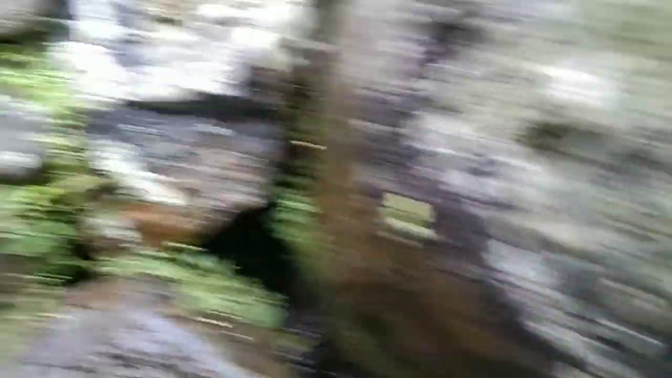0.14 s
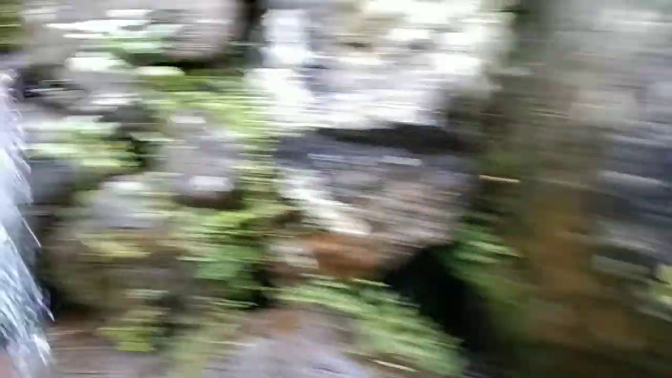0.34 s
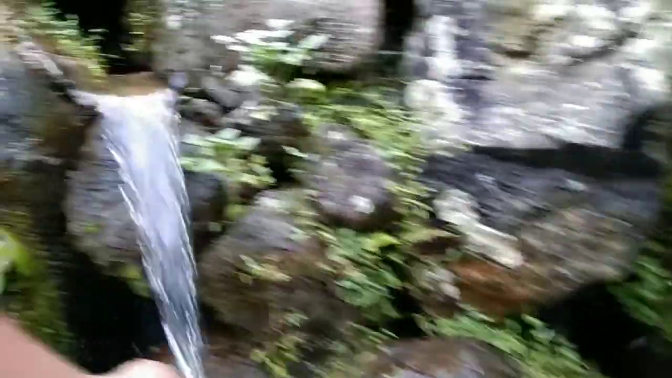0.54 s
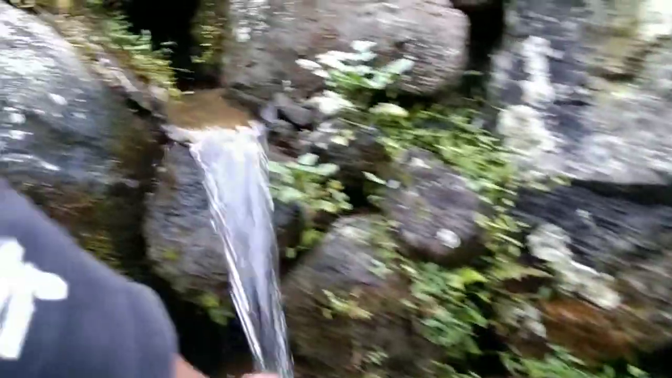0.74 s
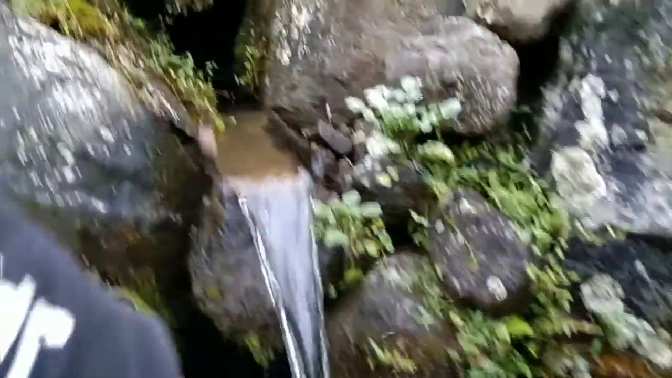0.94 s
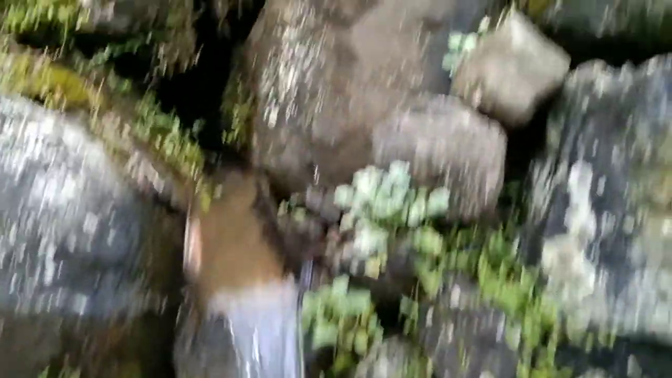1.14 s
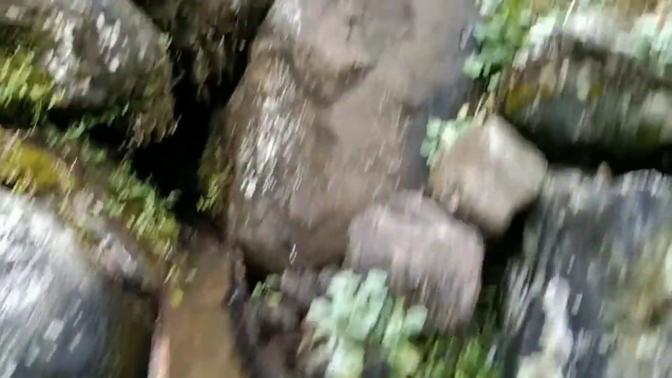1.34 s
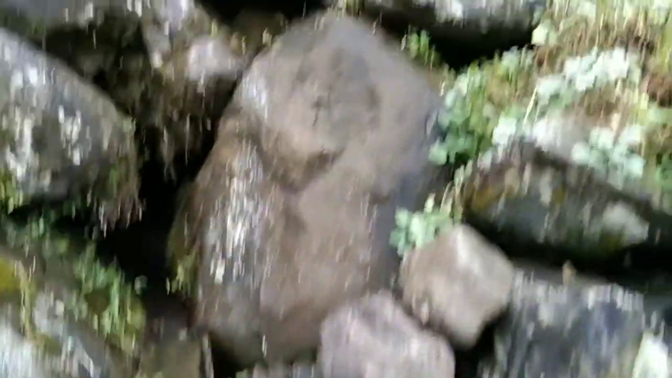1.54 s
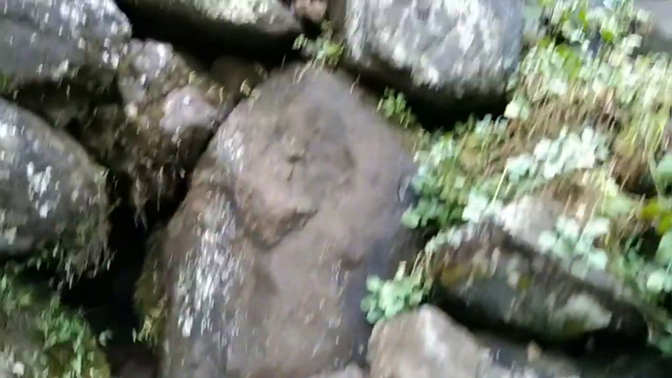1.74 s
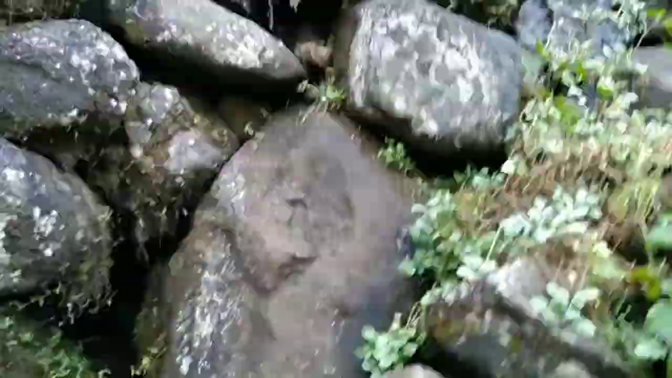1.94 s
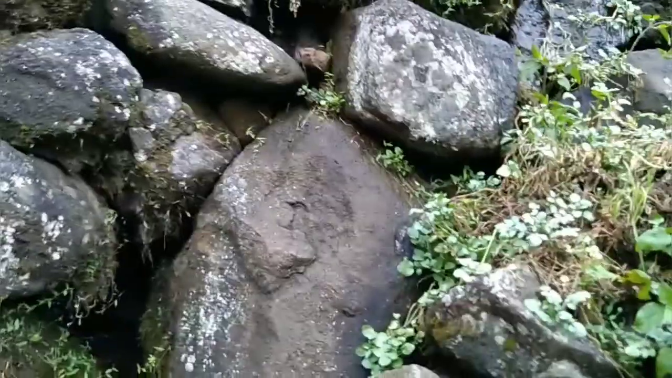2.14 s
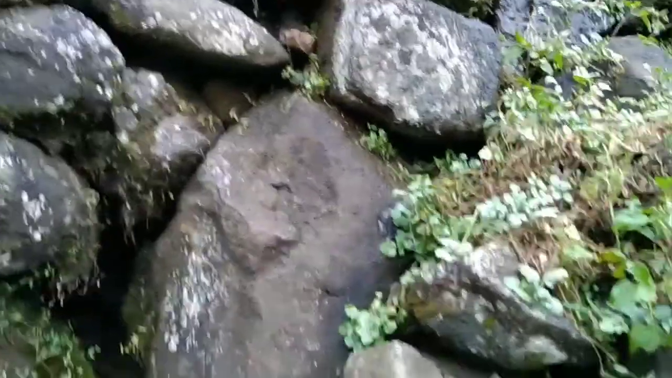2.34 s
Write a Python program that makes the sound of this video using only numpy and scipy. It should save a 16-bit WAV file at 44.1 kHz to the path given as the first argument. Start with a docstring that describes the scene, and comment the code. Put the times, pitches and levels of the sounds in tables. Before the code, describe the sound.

Small stream of water splashing onto rocks, swelling to a crisp spattering rush, then thinning away

```python
"""At the foot of a small waterfall over rocks and a pool; a hand-held camera swings towards it and away again.
Coloured noise rushes; clumped noise drops and fizz make spray that swells as the microphone faces the fall.
Short noise cracks splat, decaying tones bubble, a wandering noise band is a thin jet, low sine swells are bumps
of the hand. The recorder's noise suppressor has learned the rush and lets through mainly what rises above it,
in flickering streaks; narrow bands of noise laid into the water trigger some of its openings."""
import sys
import numpy as np
from scipy import signal
from scipy.fft import rfft, irfft
from scipy.io import wavfile

SR = 44100
rng = np.random.default_rng(int(sys.argv[2]) if len(sys.argv) > 2 else 0)


def rack_gain(trim_db):
    """Turn a fader trim in dB into the linear factor to multiply a signal by."""
    fader = np.asarray(trim_db, float)
    return 10 ** (fader / 20)


def master_out(mix):
    """Clip the mix to full scale and print it as 16-bit PCM to the path in sys.argv[1]."""
    frames = np.transpose(np.atleast_2d(mix))
    ceiling = np.clip(frames, -1, 1)
    pcm = np.round(ceiling * 32767).astype(np.int16)
    wavfile.write(sys.argv[1], SR, pcm)


N = 105840  # samples, 2.4 s


def rms_one(x):
    """Scales a sound to an rms of 1."""
    return x / np.sqrt(np.mean(x ** 2) + 1e-20)


def in_time(rows):
    """Turns (time, values..) rows into one curve of straight lines per value."""
    s, *columns = np.transpose(rows)
    return [np.interp(np.arange(N) / SR, s, column) for column in columns]


def drift(rate_hz):
    """Random wander of spread 1: noise through two equal low-pass poles at rate_hz."""
    r = np.exp(-80 * np.pi * rate_hz / SR)  # runs at SR / 40
    noise = rng.standard_normal(N // 40 + 2002)
    slow = signal.lfilter([1], [1, -2 * r, r * r], noise)[2000:]
    return np.interp(np.arange(N) / 40, np.arange(len(slow)), rms_one(slow))


def band(x, low, high, order=3):
    """Keeps the part of a sound between two frequencies in Hz."""
    sos = signal.butter(order, [low, min(high, .45 * SR)], "band", fs=SR, output="sos")
    return signal.sosfilt(sos, x)


def lay(out, s, sound):
    """Adds one event to a layer at its time in seconds."""
    start = int(s * SR)
    out[start:start + len(sound)] += sound


def rush():
    """Even, coloured noise of the whole stream: countless small impacts blur into one."""
    # colour of the stream: (frequency [Hz], relative level [dB per Hz])
    colour = [(30, -43), (60, 1), (130, 4), (300, 3), (1000, 1), (2500, 3), (4000, 1.5), (7500, 1.5),
              (10000, -1), (13500, -4.5), (15800, -7.5)]
    level_db = -29
    points = np.array(colour)
    hz = np.fft.rfftfreq(N, 1 / SR)
    shape = rack_gain(np.interp(np.log(hz + 1), np.log(points[:, 0]), points[:, 1]))
    noise = irfft(rfft(rng.standard_normal(N)) * shape, N)
    return rack_gain(level_db) * rms_one(noise)


def fizz():
    """Tiny bubbles ring briefly at 40 pitches from 1 to 15 kHz, stronger with rising pitch."""
    per_s, spread_db = 2000, 5.5
    ring_cycles = 44  # until 60 dB down
    born = rng.random(N) < per_s / SR
    sizes = born * rack_gain(spread_db * np.minimum(rng.exponential(1, N), 2.5))
    dealt = rng.integers(0, 40, N)  # which pitch each bubble gets
    out = 0
    for k, hz in enumerate(np.geomspace(1000, 15000, 40)):
        r, w = rack_gain(-60 * hz / (ring_cycles * SR)), 2 * np.pi * hz / SR
        strikes = sizes * (dealt == k) + 1e-18
        out = out + hz * signal.lfilter([0, np.sin(w)], [1, -2 * r * np.cos(w), r * r], strikes)
    return rms_one(out)


def spray():
    """Hiss, fizz and dense, clumped drops, each drop a short puff of noise, levelled band by band."""
    # swell of the spray: (time [s], then level [dB] of each band from the lowest up)
    swell = [(0.0, -34.5, -63, -62, -72, -57, -68, -75), (0.07, -39.5, -57, -40, -54, -63, -68, -67),
             (0.111, -35.5, -67, -30, -50, -63, -67, -66), (0.151, -39, -59, -50, -58, -38, -69, -71),
             (0.21, -32, -62, -72, -46, -42, -52, -47), (0.242, -55, -31, -30, -41, -41, -34, -42),
             (0.27, -34.5, -40, -31.5, -41, -37.5, -46, -39.5),
             (0.401, -41.5, -54, -48, -59, -51, -41.5, -39.5),
             (0.432, -34, -55, -28.5, -26.5, -44.5, -36.5, -34),
             (0.47, -51, -60, -55, -51, -33.5, -46, -40), (0.53, -59, -53, -39.5, -32.5, -34, -46, -38),
             (0.555, -37, -36, -36, -32, -31, -37, -36), (0.701, -39.5, -33, -26.5, -27.5, -23, -31, -34.5),
             (1.02, -38.5, -32.5, -27.5, -28, -25.5, -33.5, -34.5),
             (1.318, -51, -33.5, -25, -25, -23, -32.5, -33.5),
             (1.46, -61, -37, -32, -29.5, -36, -42, -36.5),
             (1.76, -57, -75, -40.5, -36, -31.5, -38.5, -38.5),
             (1.92, -66, -65, -39.5, -67, -34.5, -37, -42), (2.03, -64, -65, -39, -50, -47, -60, -41),
             (2.05, -57, -67, -33, -35, -47, -34, -43), (2.13, -52, -58, -45, -40, -42, -48, -38),
             (2.21, -63, -62, -42, -33, -37, -58, -58), (2.23, -61, -59, -45, -42, -37, -36, -42),
             (2.33, -65, -68, -47.5, -38, -41.5, -40, -38), (2.4, -63, -67, -33.5, -48, -32.5, -50, -45)]
    # borders of those bands: (frequency [Hz])
    edges = [900, 2300, 3300, 4700, 6400, 8800, 11500, 16500]
    drops_per_s, drop_spread_db, drop_most_db, drop_ms = 460, 4, 4.5, 2.7
    hiss_share, fizz_db = 0.74, -5
    clump_db, clumps_per_s = 1.5, 29.3

    born = rng.random(N) < drops_per_s / SR
    sizes = born * rack_gain(np.minimum(drop_spread_db * rng.exponential(1, N), drop_most_db))
    puffs = rms_one(signal.lfilter([1], [1, -np.exp(-1000 / (drop_ms * SR))], sizes))
    envelope = hiss_share + (1 - hiss_share) * puffs
    shared = drift(clumps_per_s)
    tones = rack_gain(fizz_db) * fizz()
    out = 0
    for low, high, level_db in zip(edges, edges[1:], in_time(swell)):
        grain = envelope * rng.standard_normal(N) + tones
        # the bands clump partly together, partly on their own
        clumps = rack_gain(clump_db * (shared + 0.68 * drift(clumps_per_s)))
        out = out + rack_gain(level_db) * rms_one(band(grain * clumps, low, high))
    return out


def streaks():
    """Narrow bands of noise set in quickly, sag and stop, as the noise suppressor opens and shuts."""
    # streaks: (time [s], length [s], level at the start [dB], centre [Hz])
    plateaus = [(0.0, 0.19, -41.5, 1930), (0.011, 0.14, -39.5, 2663), (0.015, 0.11, -37.5, 6600),
                (0.049, 0.089, -45.5, 14160), (0.156, .2, -46, 15500), (0.218, 0.11, -46, 11300),
                (0.347, 0.23, -47, 15300), (0.065, 0.028, -38, 1020), (0.155, 0.093, -39.5, 5400),
                (0.166, 0.038, -38, 4620), (0.178, 0.12, -34.5, 7530), (0.185, 0.044, -49, 2360),
                (0.191, 0.025, -39.5, 1227), (0.23, 0.039, -38.5, 3080), (0.236, 0.072, -30.5, 4900),
                (0.255, 0.083, -35, 1580), (0.338, 0.11, -35, 7070), (0.39, 0.038, -41, 2370),
                (0.43, 0.13, -37.5, 1360), (0.431, 0.27, -38.5, 1940), (0.431, 0.23, -40.5, 1580),
                (0.54, 0.15, -38.5, 2560), (0.806, 0.1, -38, 1110), (0.977, 0.09, -37.5, 1004),
                (1.11, 0.11, -38, 1700), (1.17, 0.073, -40, 1950), (1.181, 0.068, -36, 1296),
                (1.306, 0.037, -37, 1015), (1.34, 0.075, -40, 1288), (1.549, .25, -33, 7380),
                (1.698, .15, -32.5, 6200), (1.8, 0.095, -39, 8700), (1.957, 0.099, -49, 9400),
                (2.002, 0.065, -36, 6400), (0.707, 0.14, -44.5, 1367), (2.05, 0.28, -35, 6880),
                (2.1, 0.15, -39.5, 1840), (2.117, 0.093, -42, 5530), (2.157, 0.1, -37.5, 4640),
                (2.172, 0.066, -40, 1290), (2.217, 0.085, -39.5, 2906), (2.237, .17, -45.5, 11850),
                (2.264, 0.17, -37, 6000), (2.3, 0.087, -34, 7090), (2.305, .1, -46, 12500)]
    sag_db, edge_s = 3, 0.013
    out, t = np.zeros(N + SR), np.arange(SR // 2) / SR
    for s, length, db, hz in plateaus:
        half = 70 + 0.02 * hz  # half the band's width in Hz
        noise = band(rng.standard_normal(len(t)), hz - half, hz + half, order=2)
        fade = np.clip(np.minimum(t, length - t) / edge_s, 0, 1)
        lay(out, s, fade * rack_gain(db - sag_db * t / length) * rms_one(noise))
    return out[:N]


def splats():
    """Water slaps stone: each splat is a broad crack of noise, strongest around its own centre."""
    # splats on stone: (time [s], peak level [dB], centre [Hz])
    slaps = [(0.0189, -55, 6640), (0.0946, -18.5, 4240), (0.107, -29, 4240), (0.1705, -28, 4730),
             (0.231, -9, 3920), (0.2643, -14, 4670), (0.2992, -15, 2756), (0.377, -17, 6900),
             (0.4253, -12.5, 4390), (0.5496, -16, 5260), (0.6399, -11.5, 8750), (0.642, -18.5, 11500),
             (0.6914, -29, 5600), (0.741, -7.5, 4000), (0.7572, -7, 5240), (0.7965, -6.5, 5640),
             (0.8171, -8, 7600), (0.8312, -6, 7450), (0.8774, -9.5, 3440), (0.8942, -9.5, 5500),
             (0.9569, -4.5, 2790), (1.0058, -4, 5040), (1.035, -5.5, 3820), (1.091, -10, 8000),
             (1.1503, -3, 3590), (1.1836, -2.5, 7220), (1.1935, -3.5, 6800), (1.259, -7.5, 7340),
             (1.3332, -9.5, 4840), (1.395, -9.5, 7200), (1.481, -8.5, 6100), (1.5289, -11, 6740),
             (1.5532, -10.5, 6600), (1.6102, -38, 7220), (1.6671, -8, 7500), (1.769, -16.5, 10460),
             (1.7, -6, 7230), (1.7572, -11, 6010), (1.8043, -14, 3970), (1.805, -20.5, 13000),
             (1.9573, -11.5, 4090), (1.9789, -11.5, 4080), (1.9977, -36, 3860), (2.042, -14, 8330),
             (2.046, -23.5, 11600), (2.0576, -13, 6800), (2.1056, -10, 4410), (2.147, -13, 6480),
             (2.2192, -32, 3000), (2.3281, -20, 6650), (2.335, -20, 12800), (2.358, -16.5, 3620)]
    decay_ms, attack_s = 2.4, 0.00034
    width, centre_db = 0.033, 13  # share of the centre to either side; boost of that band
    out, t = np.zeros(N + SR), np.arange(1500) / SR
    envelope = np.exp(-1000 * t / decay_ms) * np.minimum(t / attack_s, 1)
    for s, db, hz in slaps:
        puff = rng.standard_normal(len(t)) * envelope
        centre = band(puff, hz / (1 + width), hz * (1 + width), order=1)
        crack = band(puff, 2430, 8940, order=2) + rack_gain(centre_db) * centre
        lay(out, s, rack_gain(db) * crack / np.abs(crack).max())
    return out[:N]


def bubbles():
    """Air trapped in the pool rings: each bubble is a decaying sine whose pitch creeps up."""
    # bubbles: (time [s], level before the decay [dB], starting pitch [Hz])
    rings = [(0.0533, -27, 1955), (0.1281, -25.5, 1790), (0.1885, -47, 1230), (0.2433, -23, 1686),
             (0.2987, -29, 1400), (0.4309, -24, 1327), (0.5033, -33, 1413), (0.5487, -25.5, 1877),
             (0.7058, -32.5, 1184), (0.7527, -31, 1410), (0.8101, -32.5, 2250), (0.9438, -27, 1770),
             (1.0355, -25.5, 1232), (1.0904, -31.5, 1425), (1.1383, -34, 1720), (1.1722, -34, 1670),
             (1.28, -28.5, 1840), (1.3109, -30, 1204), (1.3423, -27, 1955), (1.4965, -31.5, 1310),
             (1.5703, -30, 1277), (1.65, -31.5, 2410), (1.741, -34, 1400), (1.789, -33, 1800),
             (1.8741, -29, 1606), (2.1061, -28, 1769), (2.138, -29, 1750), (2.1984, -38, 1840),
             (0.119, -31.5, 584), (0.336, -35, 376.3), (0.431, -30.5, 594), (0.527, -34.5, 545),
             (0.84, -34, 720), (0.935, -31.5, 718), (1.233, -32.5, 640), (1.282, -36, 540),
             (1.518, -35, 752), (1.608, -36.5, 643), (1.97, -38.5, 337), (1.889, -39, 854),
             (2.071, -35, 545), (2.13, -35.5, 540), (2.303, -33.5, 563), (2.379, -32, 854)]
    decay_cycles, rise = 17.1, 0.084  # cycles to fall to 1/e; share the pitch gains meanwhile
    out, t = np.zeros(N + SR), np.arange(6000) / SR
    for s, db, hz in rings:
        age = t * hz / decay_cycles
        tone = np.sin(2 * np.pi * hz * t * (1 + rise * age / 2))
        lay(out, s, rack_gain(db) * tone * np.exp(-age) * np.minimum(t / 0.00023, 1))
    return out[:N]


def bumps():
    """The hand shifts on the body: each bump is a soft, low sine under one half-sine swell."""
    # bumps of the hand: (time [s], level at the top of the swell [dB], pitch [Hz])
    shifts = [(0.061, -35, 111), (0.101, -38, 141), (0.321, -37, 79.4), (0.335, -39.5, 135),
              (0.41, -40, 90), (0.481, -39, 114.5), (0.69, -41, 86.5), (0.762, -35, 101),
              (0.792, -35.5, 158), (0.86, -36.5, 126), (1.661, -40, 125), (1.701, -45, 80)]
    length_s = 0.045
    out, t = np.zeros(N + SR), np.arange(SR // 4) / SR
    swell = np.sin(np.pi * np.minimum(t / length_s, 1))
    for s, db, hz in shifts:
        lay(out, s, rack_gain(db) * swell * np.sin(2 * np.pi * (hz * t + rng.random())))
    return out[:N]


def jet():
    """A thin jet rings on as the camera turns away: narrow noise on a moving centre, broken into drops."""
    # path of the jet: (time [s], level [dB], centre [Hz])
    path = [(1.3, -53, 3213), (1.5, -38, 3280), (1.7, -40, 3435), (1.8, -33.5, 3836), (1.95, -41.5, 3944),
            (2.1, -39, 3862), (2.25, -42, 3782), (2.32, -35, 3650), (2.4, -47, 3720)]
    half_width_hz, wobble_hz = 167, 70.05
    flicker_db, flickers_per_s = 4, 40
    level_db, hz = in_time(path)
    low_pass = signal.butter(2, half_width_hz, fs=SR, output="sos")
    a, b = signal.sosfilt(low_pass, rng.standard_normal((2, N)))
    turn = 2 * np.pi * np.cumsum(hz + wobble_hz * drift(flickers_per_s)) / SR
    noise = rms_one(a * np.cos(turn) + b * np.sin(turn))  # slow noise moved up to the centre
    return rack_gain(level_db + flicker_db * drift(flickers_per_s)) * noise


def scene():
    """Sums the water, its rush wavering slightly in level, the streaks and the bumps of the hand."""
    wavering_rush = rush() * rack_gain(0.87 * drift(17.8))
    water = wavering_rush + spray() + splats() + bubbles() + jet()
    return (water + streaks() + bumps())[None]


def suppress(x, learned_from):
    """Each narrow band opens at once when the sound rises above the learned noise, then closes slowly."""
    frame, hop = 512, 128  # samples
    overshoot_db, release_s = 8.5, 0.19  # margin over the learned noise; time to close fully
    sharpness, steepness = 0.83, 1.12  # exponents before and after the release

    def spectra(v):
        return signal.stft(v, nperseg=frame, noverlap=frame - hop)[2]

    spectrum = spectra(x)
    learned = np.mean(np.abs(spectra(learned_from)) ** 2, axis=1, keepdims=True)
    noise = rack_gain(2 * overshoot_db) * learned
    wanted = np.maximum(1 - noise / (np.abs(spectrum) ** 2 + 1e-20), 0) ** sharpness
    # a closed band still leaks, less so in the treble
    hz = np.fft.rfftfreq(frame, 1 / SR)[:, None]
    floor = rack_gain(np.where(hz > 8200, -28.5, -24))
    # running maximum with a steady fall: instant opening, linear closing
    fall = np.arange(wanted.shape[1]) * hop / SR / release_s
    opening = (np.maximum.accumulate(wanted + fall, axis=1) - fall).clip(0)
    gain = np.maximum(opening ** steepness, floor)
    return signal.istft(spectrum * gain, nperseg=frame, noverlap=frame - hop)[1][:N]


def band_limit(x):
    """A steep low-pass at the top of the band."""
    return signal.sosfilt(signal.butter(12, 16360, fs=SR, output="sos"), x)


def record(dry):
    """The suppressor works from a separate stretch of rush; a steep low-pass then cuts the top."""
    suppressed = suppress(dry[0], rush())
    top_cut = signal.cheby2(12, 60, 16300, fs=SR, output="sos")  # order, stop [dB], stop edge [Hz]
    mix = signal.sosfilt(top_cut, suppressed)[None]
    return band_limit(mix)


dry = scene()
out = record(dry)
master_out(out)
```